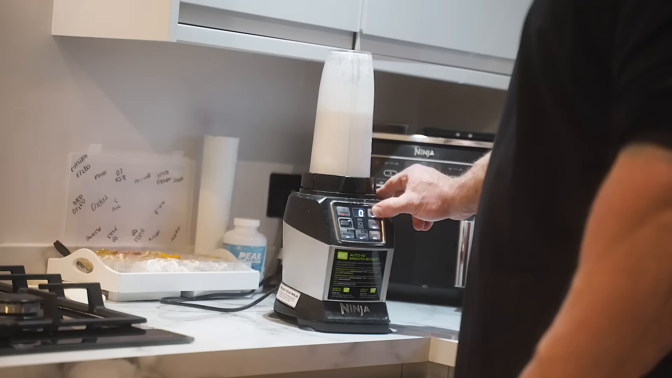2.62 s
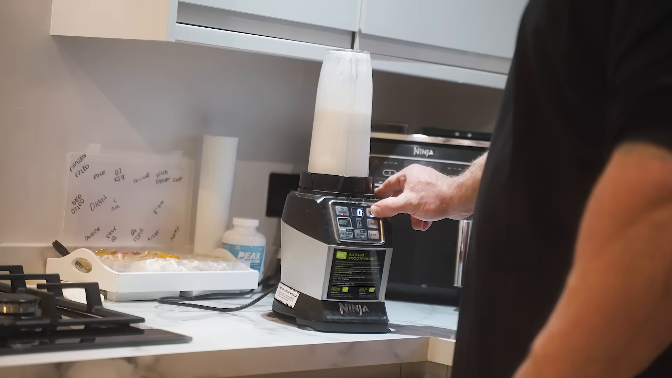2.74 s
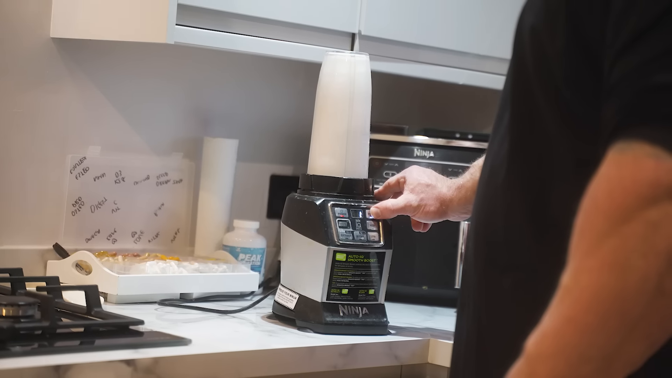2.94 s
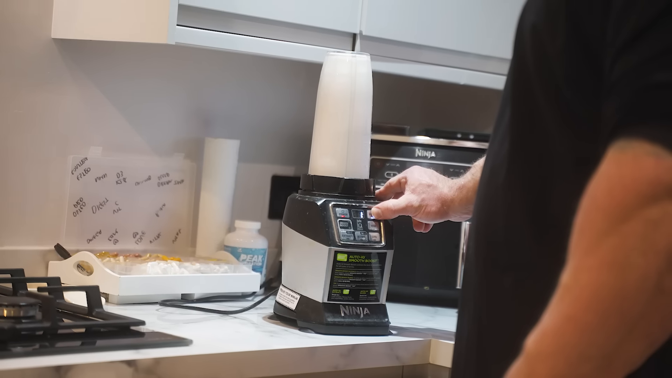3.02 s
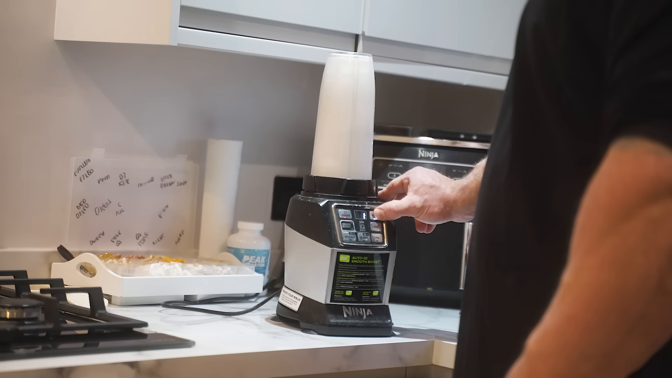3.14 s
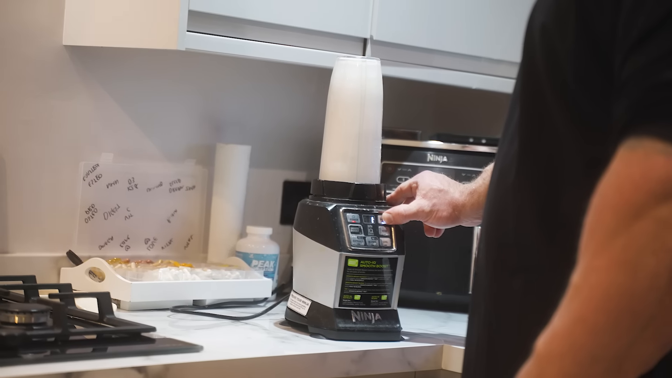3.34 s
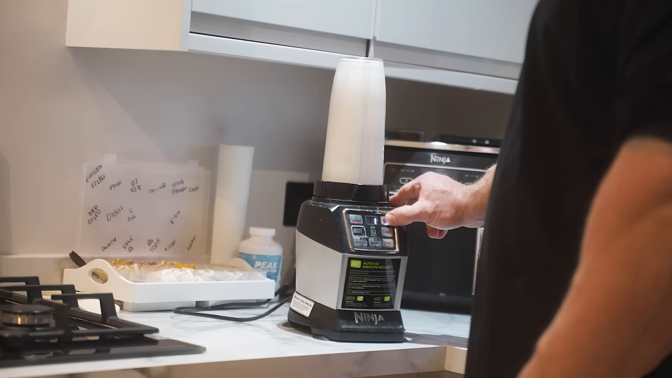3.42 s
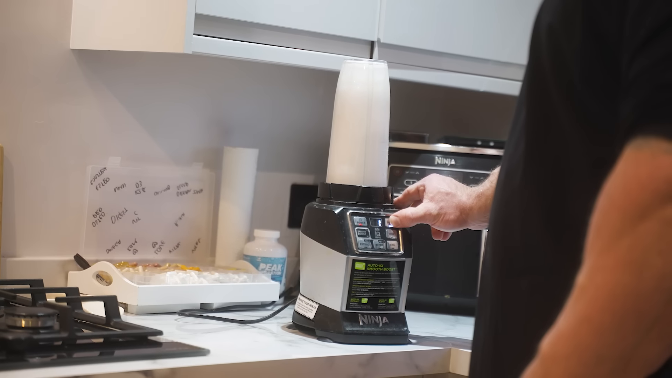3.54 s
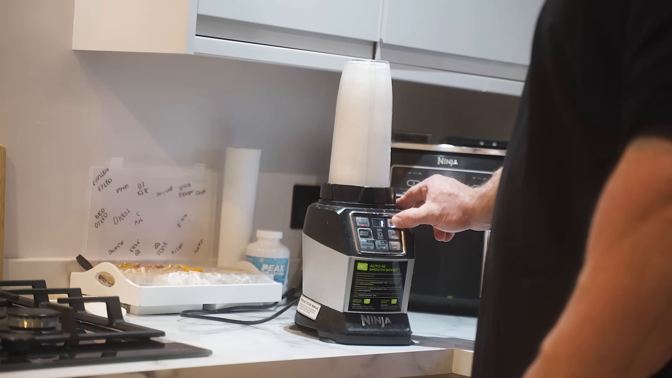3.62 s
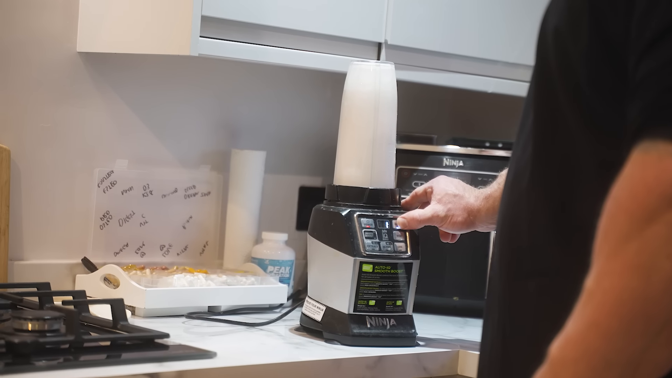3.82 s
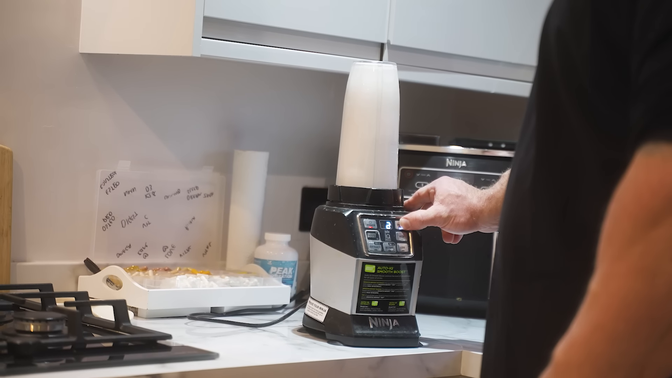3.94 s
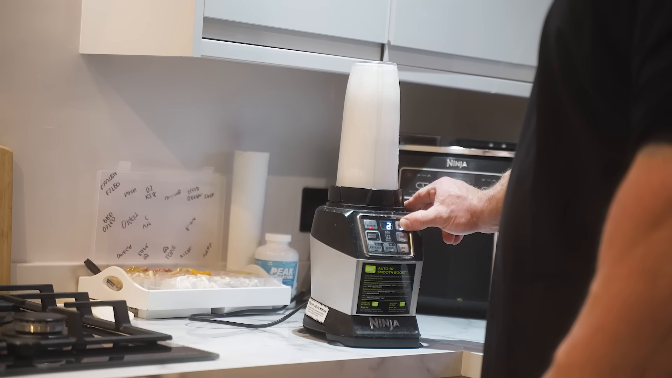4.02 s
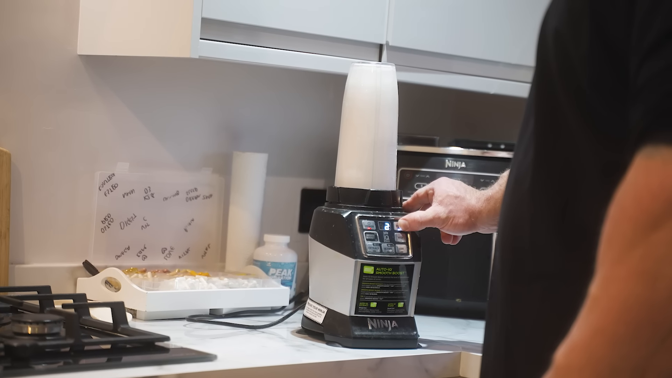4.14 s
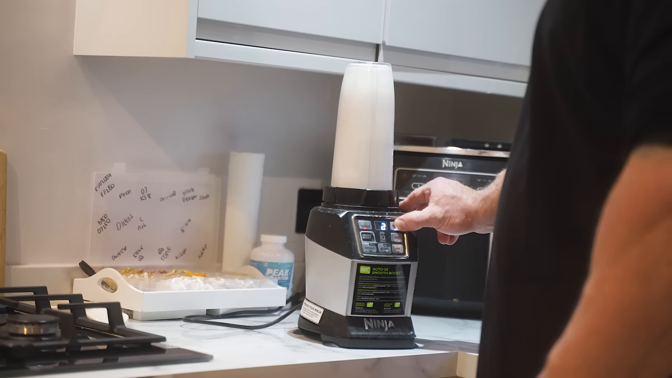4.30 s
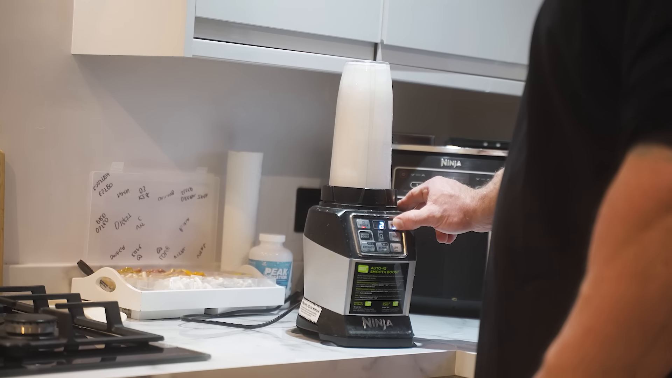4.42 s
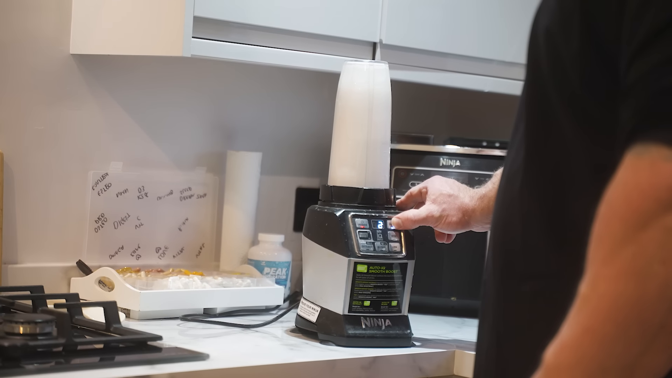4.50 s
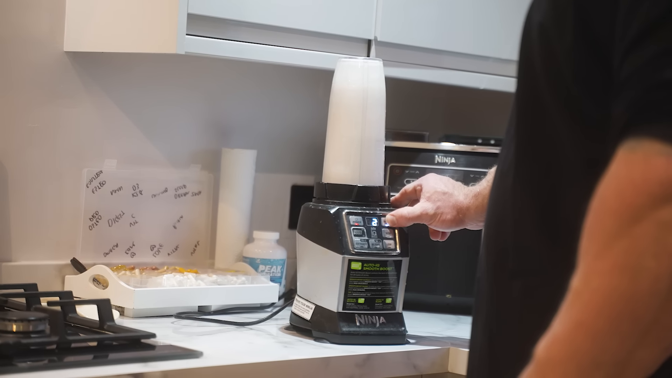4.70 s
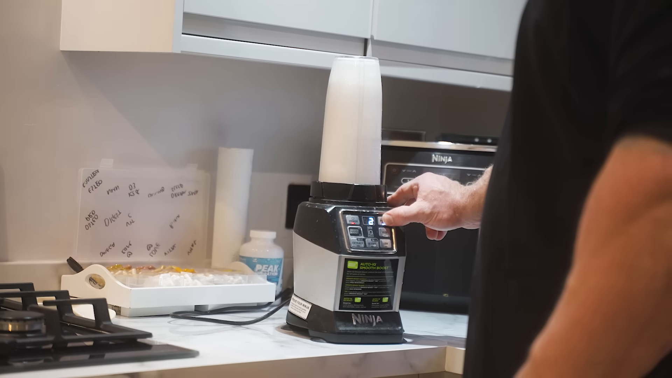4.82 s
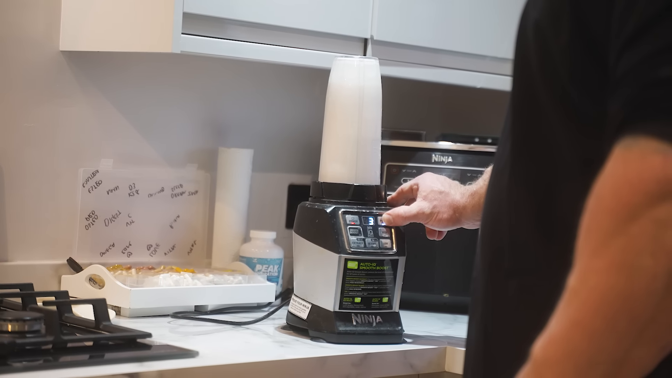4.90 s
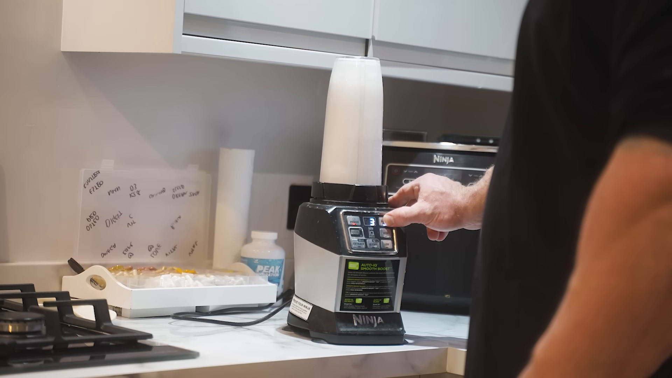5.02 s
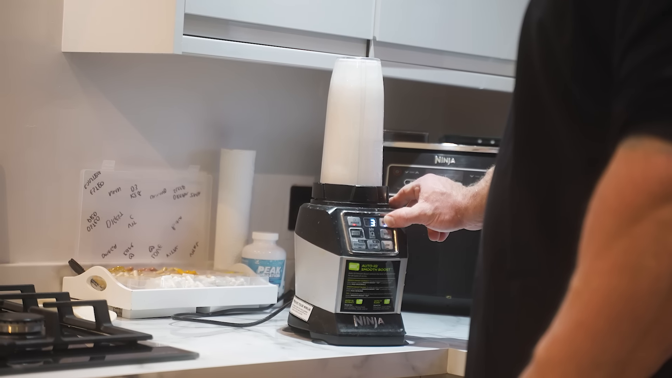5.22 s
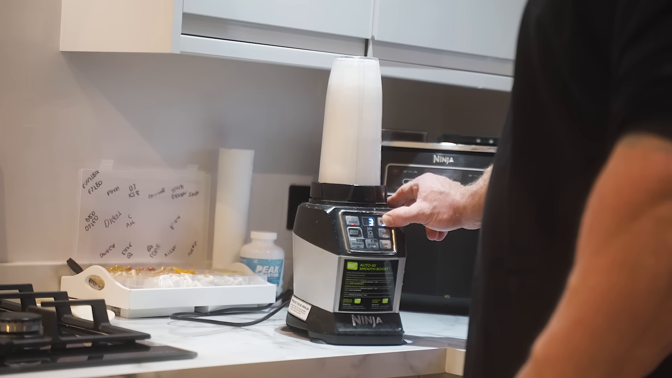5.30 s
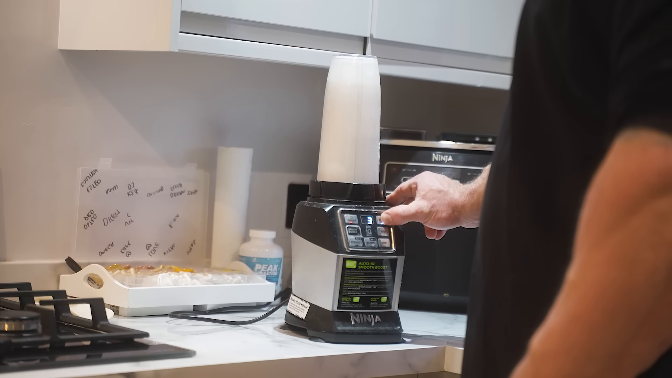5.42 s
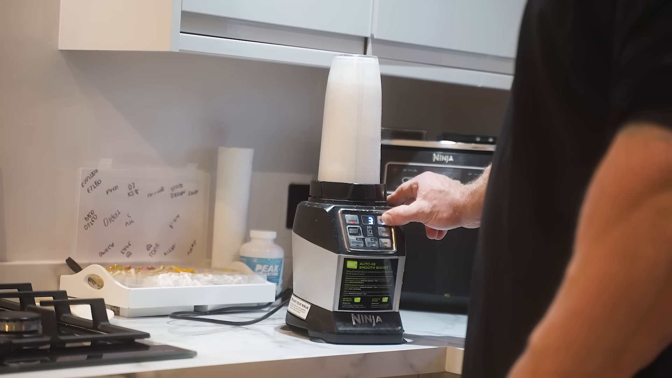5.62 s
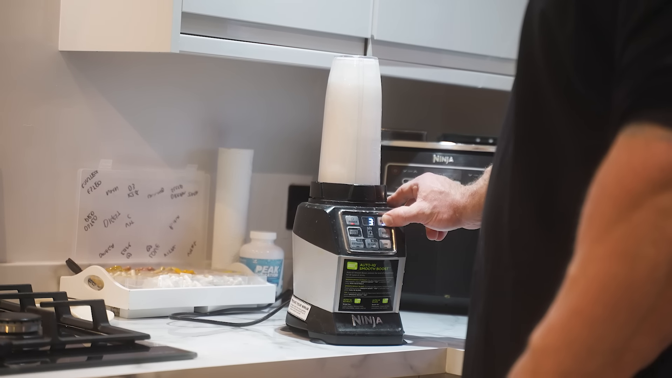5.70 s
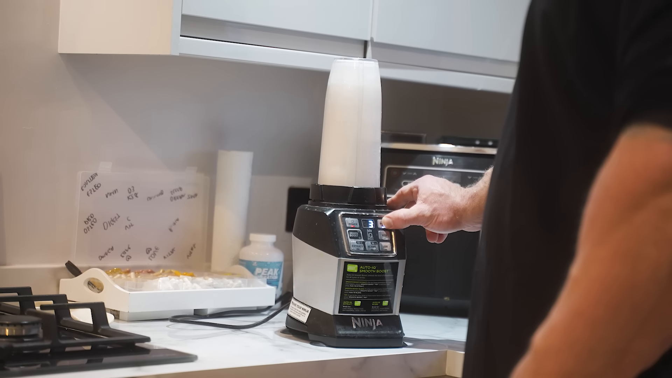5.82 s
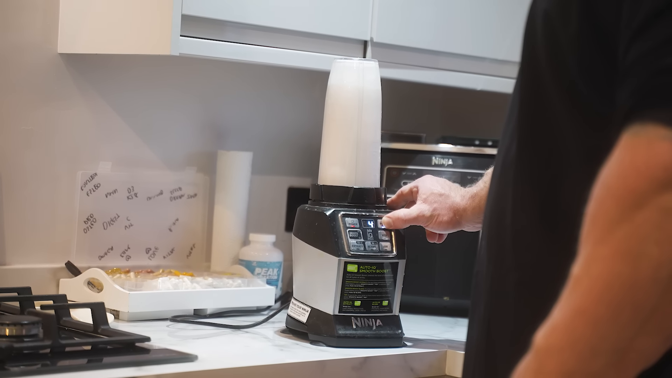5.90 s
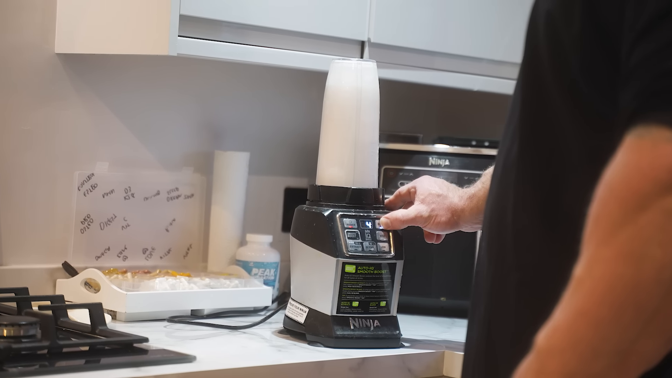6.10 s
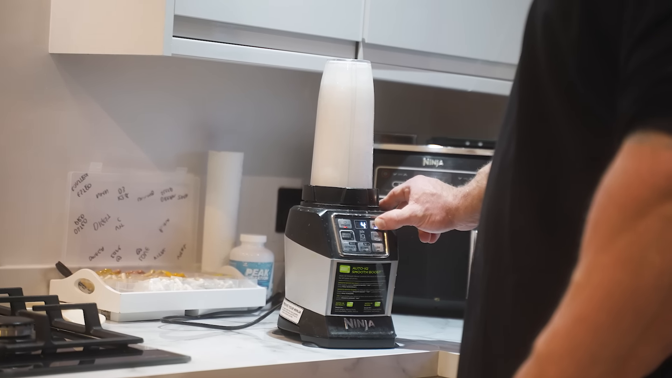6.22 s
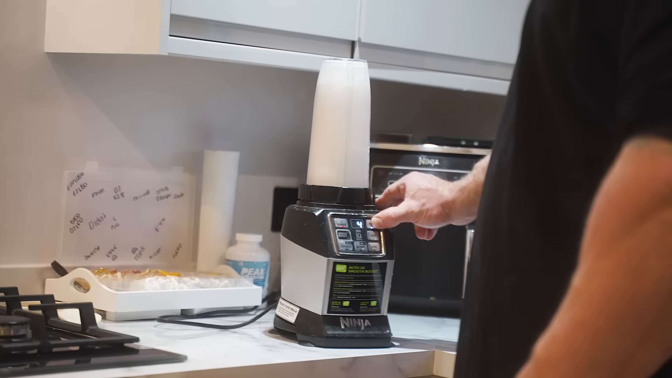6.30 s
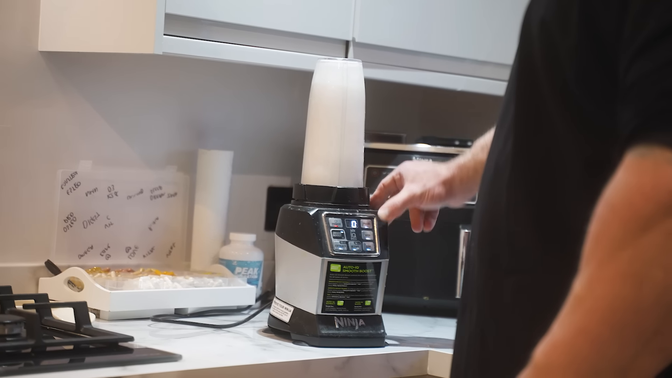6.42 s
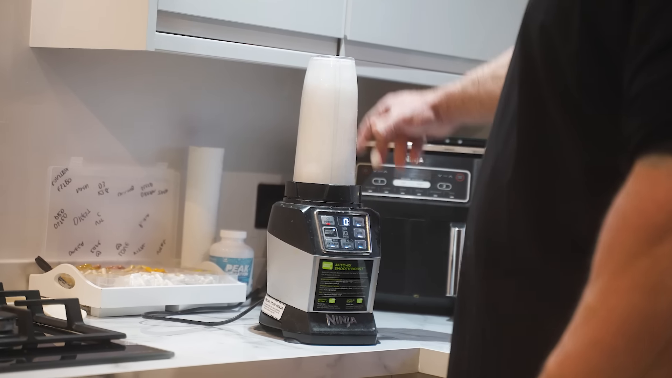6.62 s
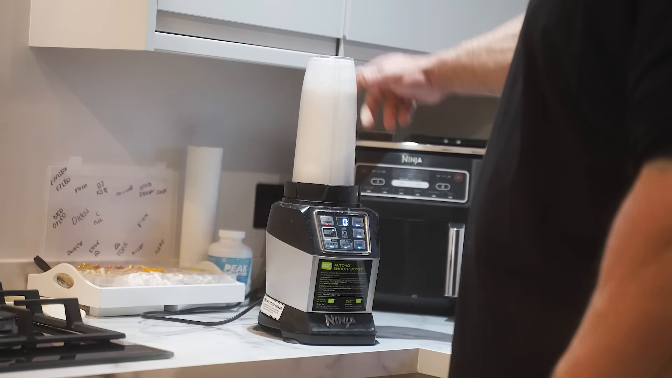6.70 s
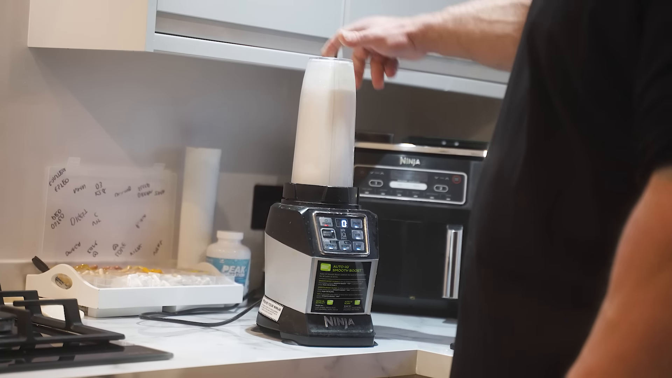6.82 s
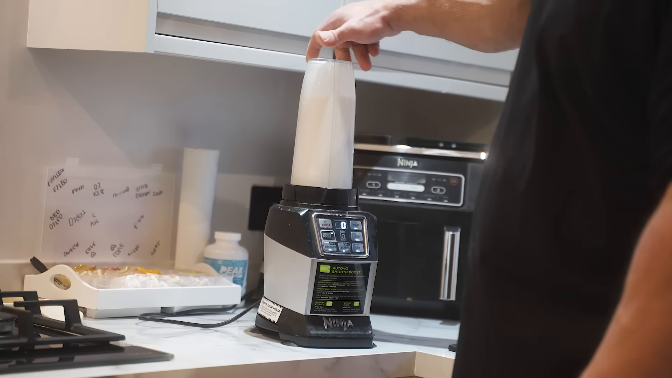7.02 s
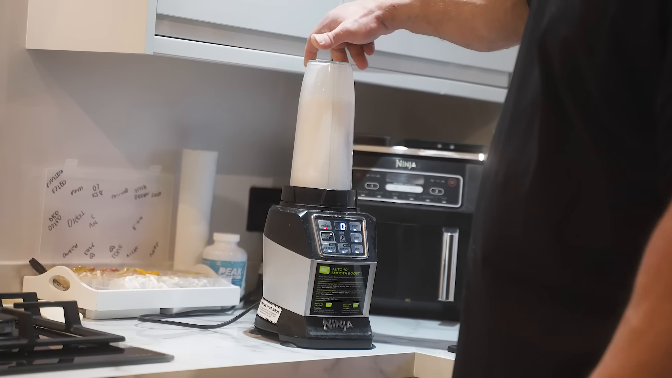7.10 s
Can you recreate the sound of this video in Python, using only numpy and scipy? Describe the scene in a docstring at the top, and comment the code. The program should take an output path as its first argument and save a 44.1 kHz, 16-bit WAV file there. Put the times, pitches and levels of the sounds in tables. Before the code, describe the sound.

A blender churns an icy drink twice, first briefly and then for several seconds, its motor coasting down after each burst.

```python
"""Blender crushing ice

A small blender on a kitchen counter: a short burst that coasts to a halt, then a long one.
The rotor hums and its bearings sing; the blades churn a thick drink and fling ice grit at the
ringing plastic cup. Lumps knock as the blades start and near a stall. Small hard room, mono."""
import sys
import numpy as np
from scipy import signal
from scipy.fft import rfft, irfft
from scipy.io import wavfile
from scipy.ndimage import uniform_filter1d

SR = 44100
rng = np.random.default_rng(int(sys.argv[2]) if len(sys.argv) > 2 else 0)


def to_wav(s):
    """Save 16-bit WAV."""
    ch = np.atleast_2d(s).T  # columns
    pcm = np.round(np.clip(ch, -1, 1) * 32767)  # PCM
    wavfile.write(sys.argv[1], SR, pcm.astype(np.int16))


N = 315315
T = np.arange(N) / SR
FREQS_HZ = np.fft.rfftfreq(N + N % 2, 1 / SR) + .01

# Button presses. Each row: on and off in seconds, top speed in Hz, spin-up in seconds,
# then base gains in dB of froth, hum, blade tones and bearings.
PRESSES = [(.144, 1.396, 293.3, .112, -18.5, -43, -54, 0),
           (2.805, 6.447, 289.3, .115, -17, -41.5, -46.5, 0)]
# Blade tones. Each row: multiple of rotor speed, relative level in dB, flutter in dB.
BLADE_TONES = [(2, 1, 1.5), (3, 1.5, 3), (1.5, -10.5, -6.5), (.79, -18, 0), (2.44, -9.5, -1.5)]
# Ball bearing tones and sidebands. Each row: multiple of rotor speed, relative level in dB, flutter in dB.
BEARING_TONES = [(5.273, -55, 1), (7.17, -49, 8), (7.54, -48, 1), (8.53, -45.5, 2), (9.587, -41, 2),
                 (10.16, -47.5, 8), (11.29, -44.5, 0.5), (11.94, -42, 2.5), (13.16, -49, 3),
                 (13.78, -52, 5), (15.86, -56, 5), (18, -68, 4), (24.9, -66, 4), (28.1, -63.5, 8)]
# Commutator whine. Each row: multiple of rotor speed, level in dB ahead of the treble weighting.
COMMUTATOR_TONES = [(36, -77), (48, -71.5), (72, -71.5), (96, -74), (120, -77), (144, -79)]
# Drink slapping the blades. Each row: peak time in seconds, hoot level in dB.
SURGES = [(.41, -39), (.51, -46), (3.25, -39), (4.42, -36.5), (4.57, -36.5), (4.85, -34.5), (5.3, -53),
          (5.72, -42), (6.08, -38.5), (6.35, -38.5)]
# Housing squeals. Each row: peak time in seconds, half length in seconds, pitch in Hz, level in dB.
SQUEALS = [(.72, .14, 4715, -47), (.75, .1, 8470, -58), (.92, .12, 2815, -41), (1.0, .3, 3478, -46),
           (1.08, .08, 5330, -55), (1.3, .09, 5315, -51), (1.32, .09, 2808, -40), (4.85, .4, 8435, -58),
           (5.52, .32, 8450, -54.5), (6.1, .12, 8445, -57)]
# Ice and drive knocks. Each row: start in seconds, jar gain in dB, crack gain in dB, rise in seconds.
KNOCKS = [(.001, -60, -57, .001), (0.1436, -35, -52, 0.00022), (0.158, -37.5, -49, .002),
          (2.153, -41, -64, .003), (2.2, -39, -60, .003), (2.298, -38.5, -51, .002),
          (2.351, -50, -49, .0005), (2.399, -49, -70, .002), (2.459, -37.5, -45, .001),
          (2.571, -45, -66, 0.0022), (2.606, -52, -58, .002), (2.796, -54, -72, .002),
          (2.805, -39.5, -46, .002), (2.848, -45, -45, .002), (2.884, -31.5, -46, .003),
          (2.906, -36, -53, .003)]
# Resonances. Each row: centre in Hz, width in Hz, relative level in dB.
CUP_MODES = [(2063, 268, 2), (2540, 280, -3), (2960, 340, 1.5), (3200, 830, 3), (3540, 480, 0.5),
             (3670, 384, -0.5), (3986, 53, 3.5)]  # cup and motor housing
BASE_MODES = [(168.8, 32, -5.5), (232.5, 35, -1), (327, 144, -4), (433, 138, 2), (620, 58, 0.5),
              (757, 170, 2), (910, 186, 2.5), (1095, 340, -1), (1540, 420, -7.5)]  # slush-filled base
JAR_MODES = [(260, 45, 0), (310, 81, 1), (566, 200, -8), (756, 89, 1.5), (1114, 410, -5), (1845, 330, -4),
             (2080, 133, 1.5), (3050, 810, 0), (3790, 260, -0.5), (4680, 860, -14.5), (6170, 220, -17.5),
             (8600, 63, -18.5)]  # jar struck by loose lumps
# Noise spectra. Each row: frequency in Hz, relative density in dB.
FROTH_SPECTRUM = [(2500, -25.5), (4000, -2), (4700, 0.5), (5400, -2.5), (6200, -4.5), (7000, -6),
                  (7800, -3.5), (8600, -11), (10000, -16.5), (16000, -66)]
GRIT_SPECTRUM = [(1000, -39), (3500, 15.5), (6000, 5), (9000, 0.5), (10600, 0), (12500, -3), (14000, -6.5),
                 (16000, -9)]
ROOM_SPECTRUM = [(20, -2), (55, -5), (90, -27), (160, 6), (300, 1), (700, 1), (1400, -5.5), (3700, 4),
                 (7000, -12), (16000, -30)]
# Drift as the drink turns smooth. Each entry: layer, dB per second since switch-on.
DRIFT_DB_PER_S = dict(rattle=-0.235, churn=0.47, froth=0.57, grit=0.14, hum=-0.8)

FULL_SPEED_HZ = 290


def undb(db):
    """Decibels to gain."""
    return 10 ** (np.asarray(db) / 20)


def unit(x):
    """Scale to rms 1."""
    return x / np.sqrt(np.mean(x ** 2))


def walk(rate_hz):
    """Random steps, smoothed twice; rms 1."""
    hold = max(int(SR / rate_hz), 2)
    steps = np.repeat(rng.standard_normal(N // hold + 2), hold)
    return unit(uniform_filter1d(uniform_filter1d(steps, hold), hold)[:N])


def slope(points):
    """Gain over frequency through (Hz, dB) points."""
    hz, db = np.transpose(points)
    return undb(np.interp(np.log(FREQS_HZ), np.log(hz), db))


def resonances(modes):
    """Gain over frequency of steep-sided resonances."""
    power = 0
    for hz, width_hz, db in modes:
        detuning = (FREQS_HZ - hz ** 2 / FREQS_HZ) / (2 * width_hz)
        power += undb(db) ** 2 / (1 + 2 * detuning ** 2) ** 2
    return np.sqrt(power)


def ring(x, gain):
    """Minimum-phase body with this gain shape; white noise keeps its rms."""
    cepstrum = irfft(np.log(unit(gain) + 1e-4))
    size = len(cepstrum)
    cepstrum[1:size // 2] *= 2
    cepstrum[size // 2 + 1:] = 0
    response = irfft(np.exp(rfft(cepstrum)))[:size // 64]
    return signal.fftconvolve(x, response)[:N]


def impacts(rate_hz, spread_db):
    """Random tiny impacts, a few harder than the rest."""
    hardness = np.minimum(rng.exponential(size=N), 5)
    hit = rng.random(N) < rate_hz / SR
    return unit(hit * rng.choice([-1, 1], N) * undb(spread_db * hardness) / np.sqrt(rate_hz))


def tone(hz, wander_hz):
    """Sine with a randomly slipping pitch; rms 1."""
    cycles = np.cumsum(hz + wander_hz * walk(45)) / SR + rng.random()
    return np.sqrt(2) * np.sin(2 * np.pi * cycles)


def partials(hz, table, slip_hz):
    """Fluttering rotor harmonics; the small housing cannot radiate the deepest."""
    out = 0
    for order, db, flutter_db in table:
        radiated = 1 / np.sqrt(1 + (168 / (order * hz)) ** 14)
        level = undb(db + flutter_db * (walk(28) - flutter_db / 9))
        out += radiated * level * tone(order * hz, slip_hz * np.sqrt(order))
    return out


def rotor(on_s, off_s, top_hz, spin_up_s, drag_s=.85, friction_hz_per_s=48, stall_hz=33.2):
    """Speed in Hz: a rise against the ice, then a coast under drag and friction until lumps stall it."""
    age_s = np.maximum(np.minimum(T, off_s) - on_s, 0)
    ice_brake = 1 - .015 * np.exp(-age_s / .6)
    driven_hz = top_hz * (1 - np.exp(-(age_s / spin_up_s) ** 1.05)) * ice_brake
    friction_hz = friction_hz_per_s * drag_s
    hz = (driven_hz + friction_hz) * np.exp(-np.maximum(T - off_s, 0) / drag_s) - friction_hz
    return np.where((T > off_s) & (hz < stall_hz), 0, hz)


def slush_levels(hz, age_s, froth_db):
    """Overall gain, then relative churn, froth and grit, in dB; all follow speed and running time."""
    slow = np.clip(1 - hz / FULL_SPEED_HZ, 0, 1)
    spin_up_db = 9 * slow * np.exp(-age_s / .14)
    slosh_db = (.32 + 1.88 * slow) * walk(14)
    return (-32.1 - 25 * slow + spin_up_db + slosh_db + DRIFT_DB_PER_S["rattle"] * age_s,
            -6 + 10 * slow + DRIFT_DB_PER_S["churn"] * age_s,
            froth_db + 2 + 7 * slow + DRIFT_DB_PER_S["froth"] * age_s,
            -16.5 + 4.5 * slow + DRIFT_DB_PER_S["grit"] * age_s)


def slush(hz, overall_db, churn_db, froth_db, grit_db):
    """Fast blades churn the drink and spray ice at the wall; slow blades tumble the lumps."""
    speed = hz / FULL_SPEED_HZ
    whirl = np.minimum(speed, 1) ** 1.38
    gust = undb(.39 * walk(45)) * unit(1 + .062 * np.cos(2 * np.pi * np.cumsum(hz) / SR))
    ice = impacts(1500 + 2500 * speed, spread_db=2.5)

    def force(grain, noise):
        return gust * unit(grain * ice + noise * rng.standard_normal(N))

    churn = ring(force(.41, 1), resonances(BASE_MODES)) * undb(churn_db + .81 * walk(25))
    rattle = ring(force(1, 1.14), resonances(CUP_MODES)) * undb(-1.67)
    froth = ring(force(.5, 1), slope(FROTH_SPECTRUM)) * undb(froth_db)
    grit = ring(force(1, .707), slope(GRIT_SPECTRUM)) * undb(grit_db)
    lumps = unit(impacts(500, spread_db=.5) + 1.38 * rng.standard_normal(N))
    tumble = ring(lumps, resonances(JAR_MODES)) * undb(2.5) * np.sqrt(np.maximum(1 - whirl ** 2, .03))
    spray = whirl * (rattle + froth) + (.4 + .36 * whirl) * churn
    return undb(overall_db) * (spray + tumble + grit)


def motor(hz, age_s, coast_s, hum_db, blade_db, bearing_db):
    """Hum and blade tones swell with speed; the drive skids below full speed. Adds the other tones."""
    speed = np.minimum(hz / FULL_SPEED_HZ, 1)
    skid = np.clip((.97 - speed) * 12, 0, 1)
    shudder = (1 + .7 * skid * walk(60)) * (1 - .51 * skid)
    bite = np.exp(-(np.maximum(T - PRESSES[0][0], 0) / .46) ** 4)  # first cut into the still drink
    unloaded = 1 - np.exp(-coast_s / .077)  # power off: the unbalanced blades hum on
    hum_gain = undb(hum_db + DRIFT_DB_PER_S["hum"] * age_s - 6 * bite + 3.5 * unloaded)
    hum = partials(hz, [(1, 0, 1.4)], slip_hz=1.76) * hum_gain * speed ** 2.7
    blades = partials(hz, BLADE_TONES, slip_hz=1.5) * undb(blade_db + 15 * bite) * speed ** 3
    hoot = hoots(hz)
    song = bearings(hz, age_s) * undb(bearing_db) * speed ** 4 * (1 - .57 * skid)
    whirr = scrape(hz) * skid * speed ** 3
    return (hum + blades) * shudder + hoot + song + whirr + squeals() + commutator(hz, speed)


def hoots(hz):
    """The swirling drink slaps back onto the blades and sounds the third harmonic."""
    swell = sum(undb(db) * np.exp(-((T - peak_s) / .039) ** 2) for peak_s, db in SURGES)
    return swell * tone(3 * hz, wander_hz=7.37)


def bearings(hz, age_s, run_in_s=2.5):
    """Ball bearings sing; the upper tones grow as the motor runs in."""
    lower = partials(hz, [row for row in BEARING_TONES if row[0] < 8], slip_hz=1.795)
    upper = partials(hz, [row for row in BEARING_TONES if row[0] >= 8], slip_hz=1.8)
    run_in_db = np.interp(age_s, [0, run_in_s], [-4.5, 2.5])
    return lower + undb(run_in_db) * upper


def scrape(hz):
    """The skidding drive rings cup and housing with two rough tones."""
    rough = tone(11.85 * hz, wander_hz=20) * walk(200) + tone(13 * hz, wander_hz=20) * walk(700)
    return undb(-49.5) * ring(rough, resonances(CUP_MODES))


def squeals():
    """Thin housing tones that come and go."""
    out = 0
    for peak_s, half_s, hz, db in SQUEALS:
        swell = np.exp(-((T - peak_s) / half_s) ** 2)
        out += undb(db + .92 * walk(27.2)) * swell * tone(hz, wander_hz=5.7)
    return out


def commutator(hz, speed):
    """Sparking brushes whistle in the high treble only."""
    out = 0
    for order, db in COMMUTATOR_TONES:
        treble = np.interp(order * hz, [8000, 10500, 14000, 16000], [0, 1, 1, 0])
        sparking = unit(1 + 1.2 * speed * walk(400))
        out += treble * undb(db) * sparking * tone(order * hz, wander_hz=44.7)
    return out


def knocks(jar_t60_s=.1, thud_db=-6):
    """Each lump shatters in a burst that thuds in the base, rings the jar and cracks."""
    jar, crack = np.zeros((2, N))
    for start_s, jar_db, crack_db, rise_s in KNOCKS:
        age_s = np.maximum(T - start_s, 0)
        fade = (1 - np.exp(-age_s / rise_s)) * np.exp(-np.log(1000) * age_s / jar_t60_s)
        jar += undb(jar_db) * fade
        crack += undb(crack_db) * fade ** .73
    bodies = [(undb(thud_db) * jar, resonances(BASE_MODES)),
              (jar, resonances(JAR_MODES)),
              (crack, slope(GRIT_SPECTRUM))]
    return sum(ring(force * rng.standard_normal(N), body) for force, body in bodies)


def kitchen(x, t60_s=.15, wet_db=-10, floor_db=-74):
    """Close walls and cupboards add a short tail over a faint steady floor."""
    t = T[:SR // 2]
    tail = rng.standard_normal(len(t)) * (t > .003) * np.exp(-np.log(1000) * t / t60_s)
    echo = signal.fftconvolve(x, tail / np.linalg.norm(tail))[:N]
    floor = ring(rng.standard_normal(N), slope(ROOM_SPECTRUM))
    return x + undb(wet_db) * echo + undb(floor_db) * floor


def scene():
    """Two bursts; speed wavers most while the ice is whole. Only the cup excites the room."""
    presses = np.array(PRESSES)
    latest = np.maximum(np.searchsorted(presses[:, 0], T) - 1, 0)
    on_s, off_s, _, _, froth_db, *motor_db = presses[latest].T
    age_s, coast_s = np.maximum(T - on_s, 0), np.maximum(T - off_s, 0)
    hz = sum(rotor(*press[:4]) for press in PRESSES)
    turning = uniform_filter1d((hz > 0).astype(float), size=128)
    waver = .001008 + .006 * np.exp(-age_s / 1.101)
    hz = np.maximum(hz, 1) * (1 + waver * walk(10))
    cup = turning * slush(hz, *slush_levels(hz, age_s, froth_db)) + knocks()
    drive = turning * motor(hz, age_s, coast_s, *motor_db)
    return np.tile(drive + kitchen(cup), (2, 1))


def record(dry):
    """Steep low-pass at 15750 Hz."""
    return signal.sosfilt(signal.ellip(10, .2, 70, 15750, fs=SR, output="sos"), dry)


dry = scene()
out = record(dry)
to_wav(out)
```